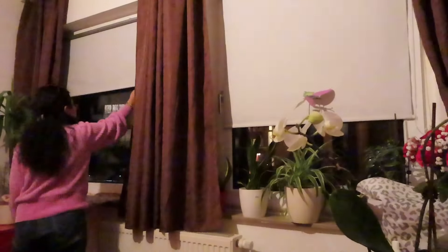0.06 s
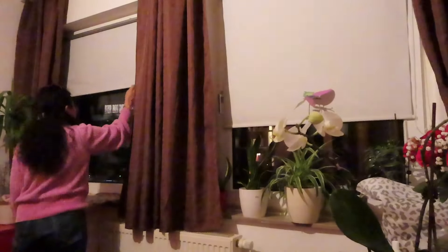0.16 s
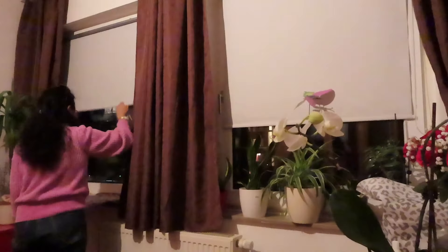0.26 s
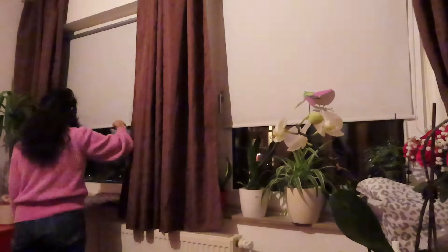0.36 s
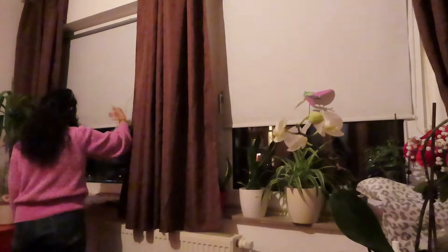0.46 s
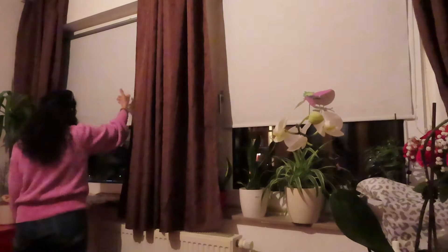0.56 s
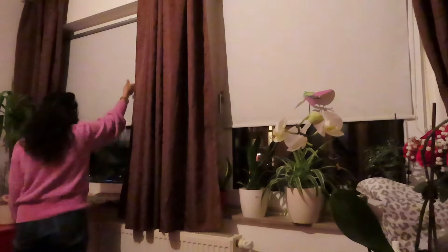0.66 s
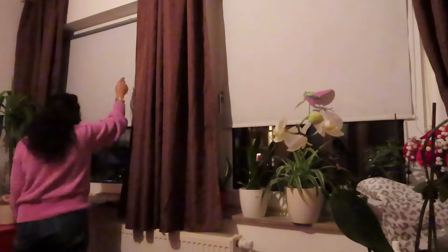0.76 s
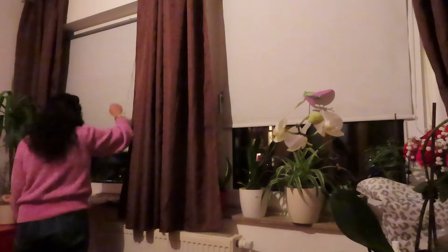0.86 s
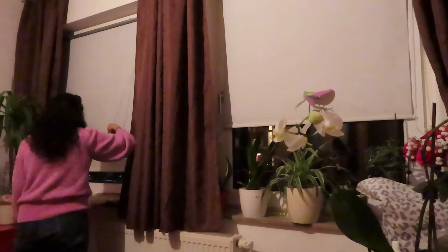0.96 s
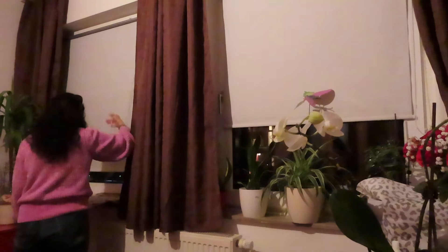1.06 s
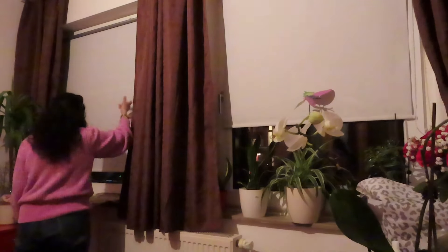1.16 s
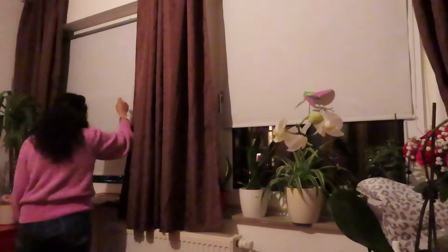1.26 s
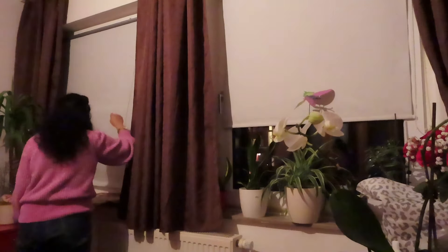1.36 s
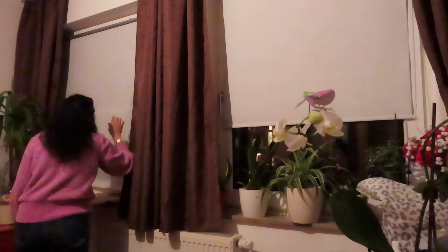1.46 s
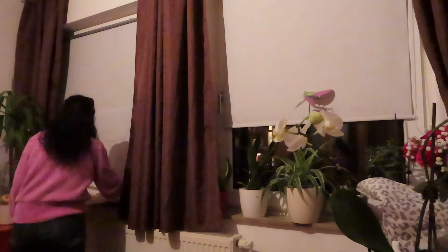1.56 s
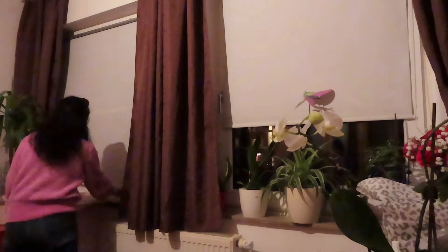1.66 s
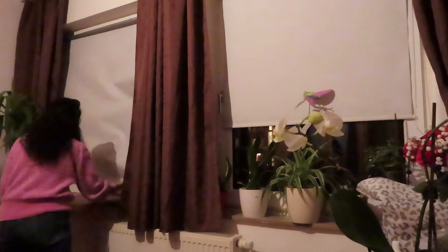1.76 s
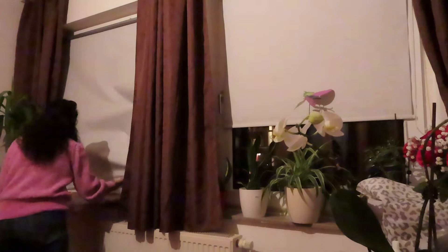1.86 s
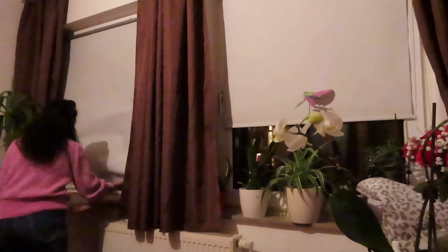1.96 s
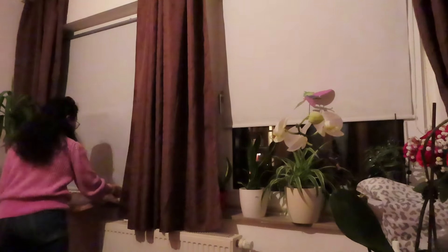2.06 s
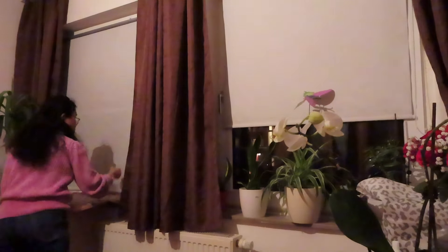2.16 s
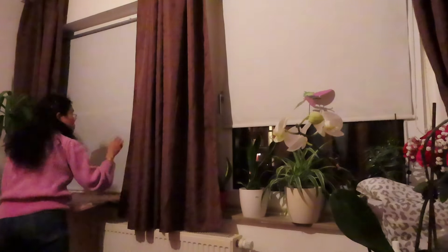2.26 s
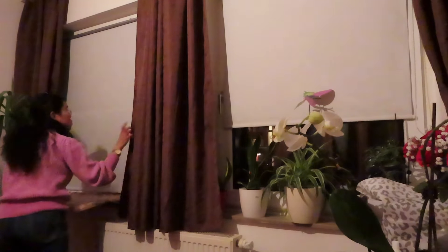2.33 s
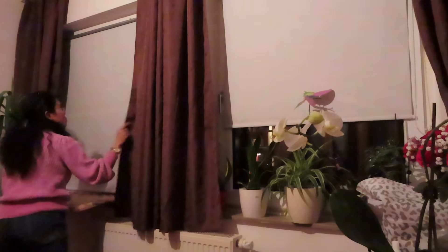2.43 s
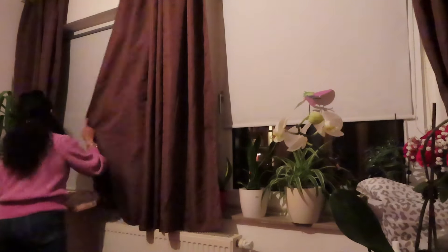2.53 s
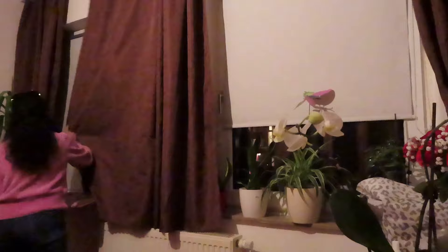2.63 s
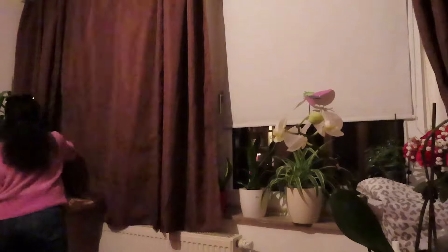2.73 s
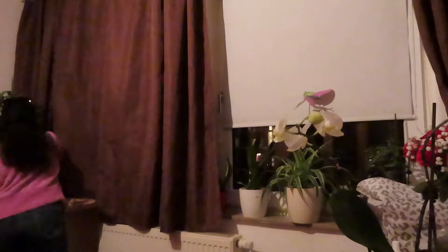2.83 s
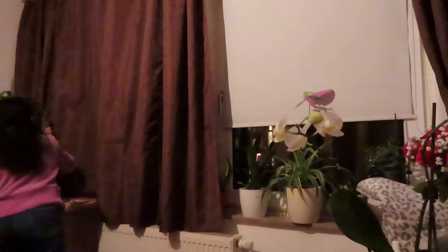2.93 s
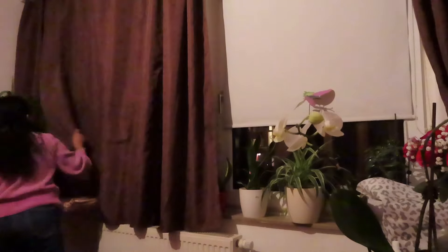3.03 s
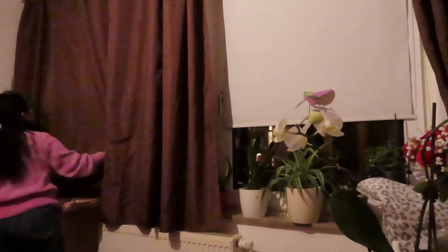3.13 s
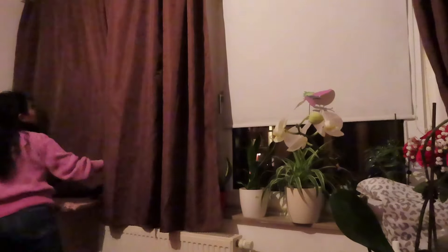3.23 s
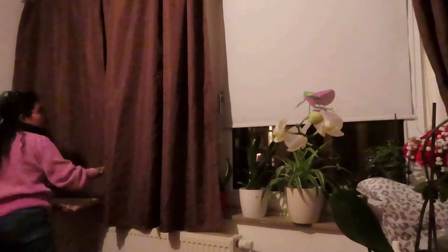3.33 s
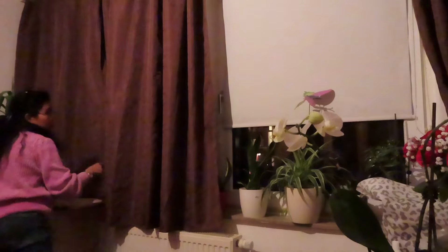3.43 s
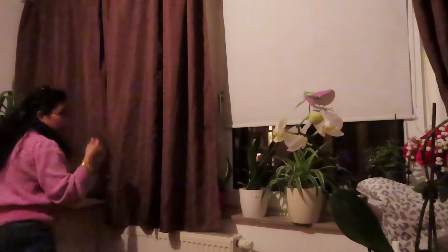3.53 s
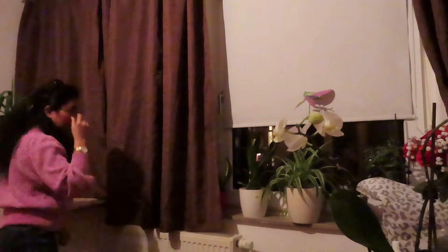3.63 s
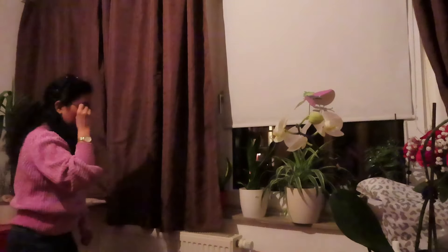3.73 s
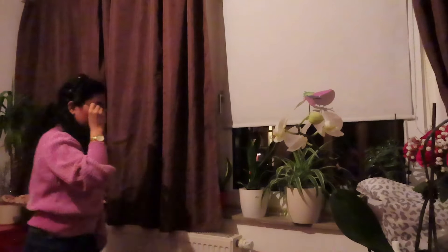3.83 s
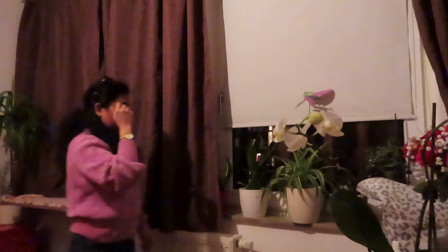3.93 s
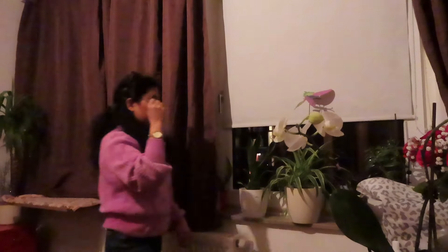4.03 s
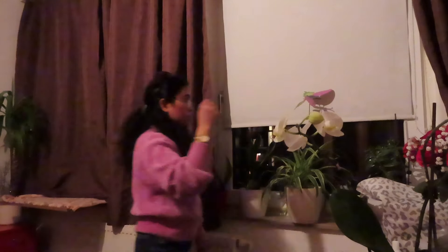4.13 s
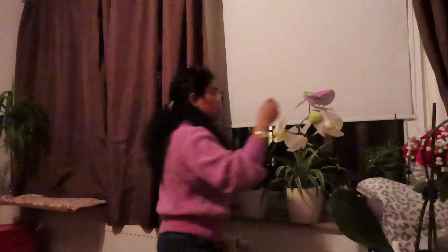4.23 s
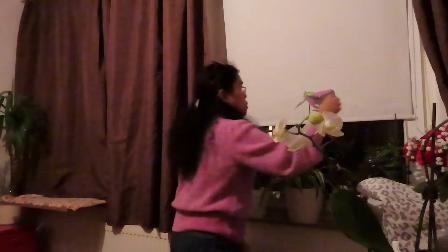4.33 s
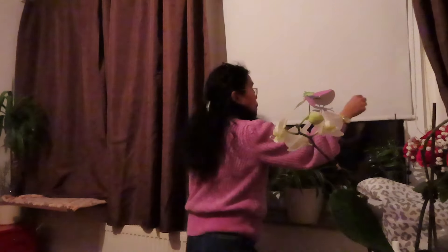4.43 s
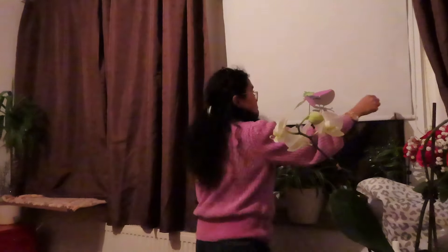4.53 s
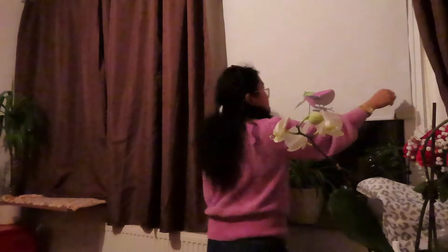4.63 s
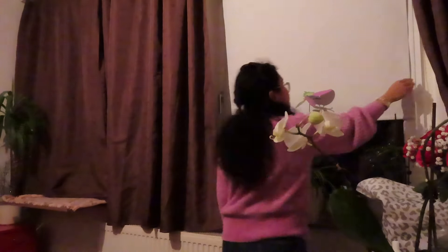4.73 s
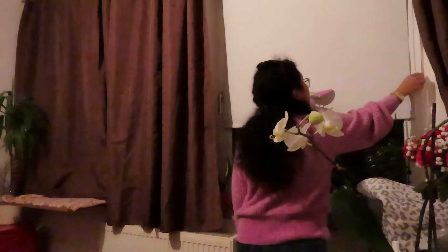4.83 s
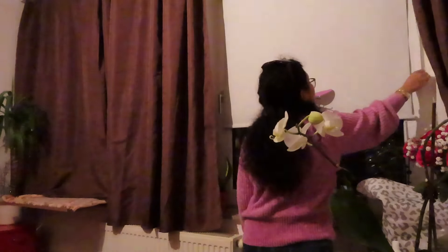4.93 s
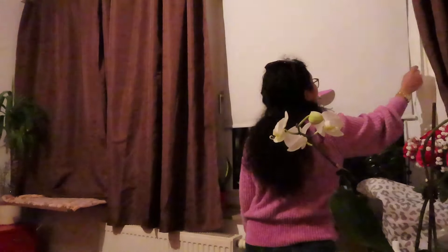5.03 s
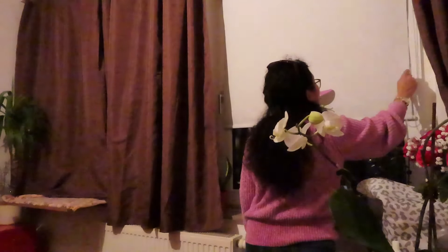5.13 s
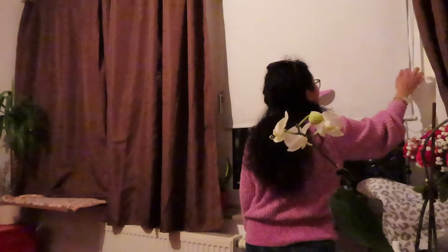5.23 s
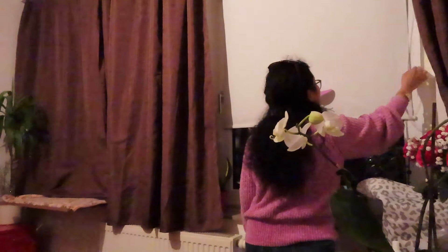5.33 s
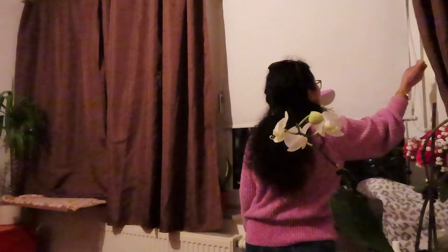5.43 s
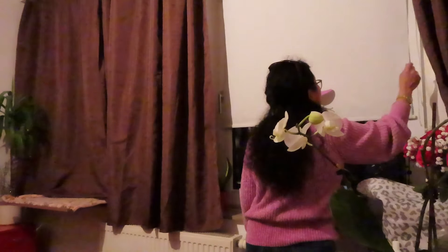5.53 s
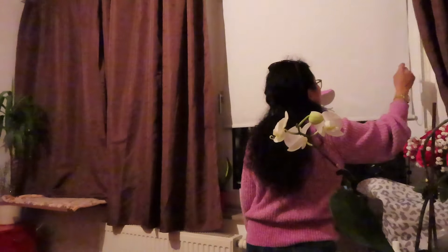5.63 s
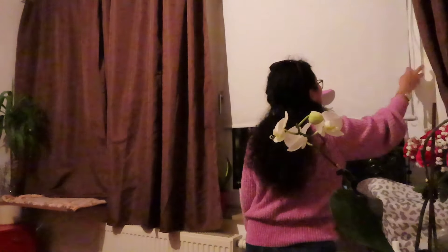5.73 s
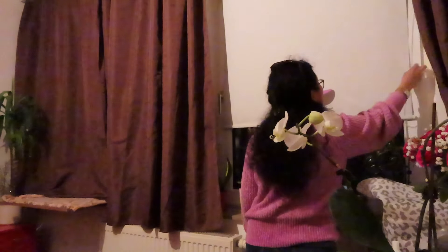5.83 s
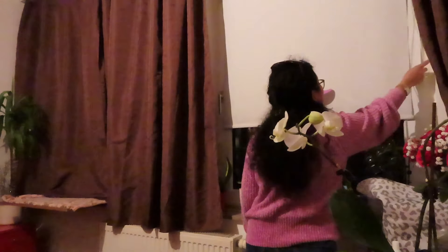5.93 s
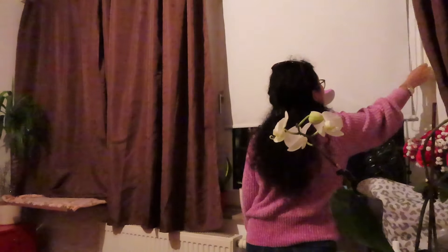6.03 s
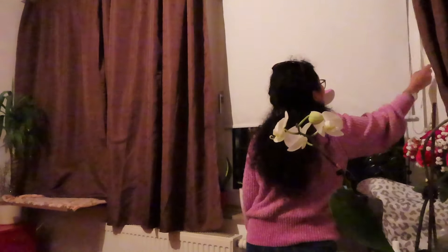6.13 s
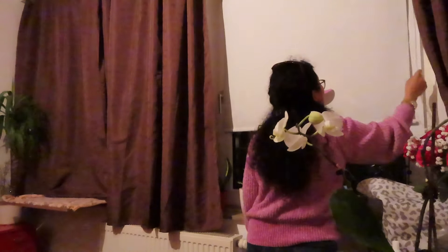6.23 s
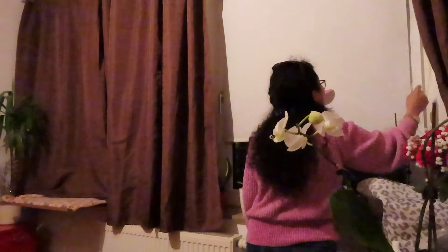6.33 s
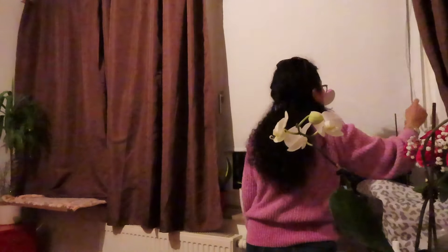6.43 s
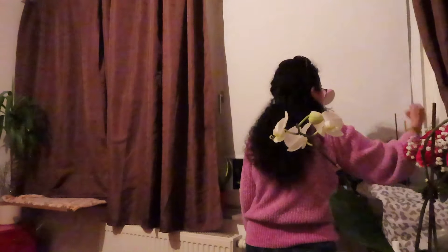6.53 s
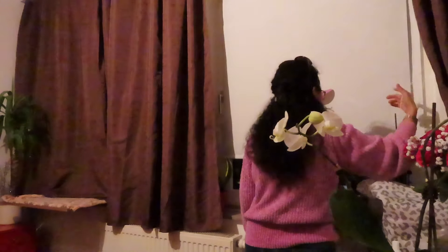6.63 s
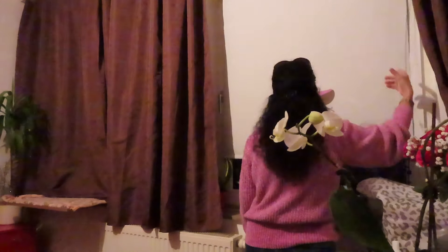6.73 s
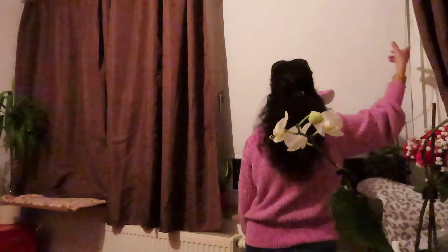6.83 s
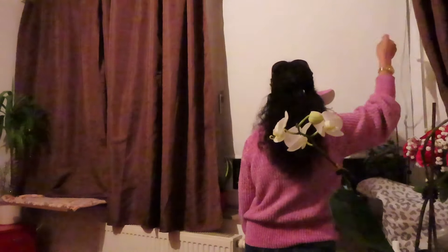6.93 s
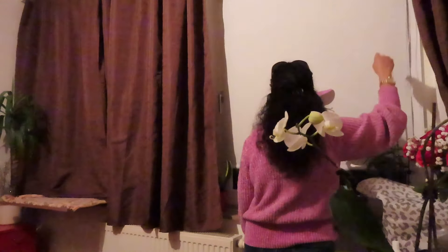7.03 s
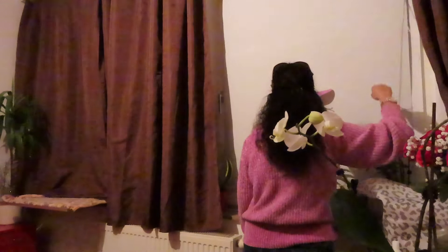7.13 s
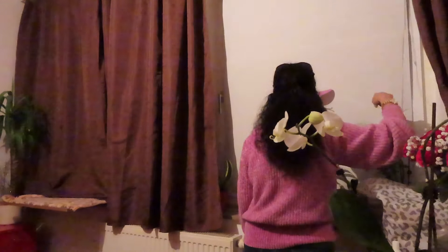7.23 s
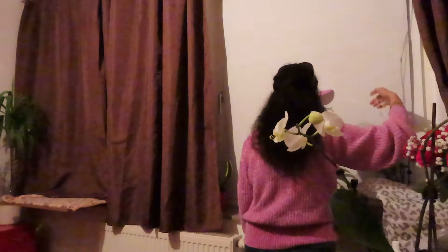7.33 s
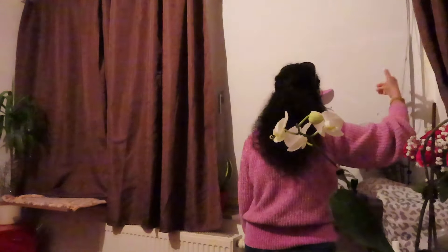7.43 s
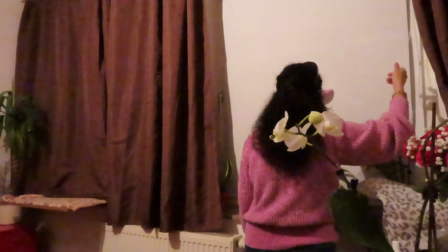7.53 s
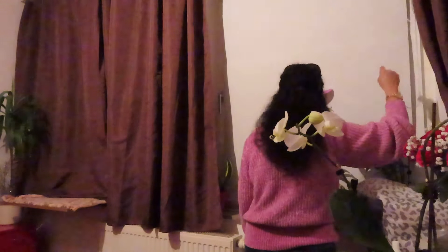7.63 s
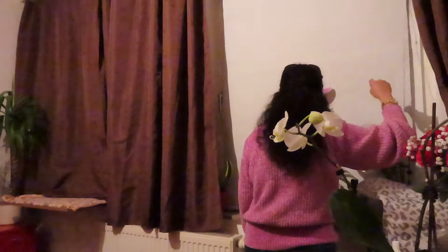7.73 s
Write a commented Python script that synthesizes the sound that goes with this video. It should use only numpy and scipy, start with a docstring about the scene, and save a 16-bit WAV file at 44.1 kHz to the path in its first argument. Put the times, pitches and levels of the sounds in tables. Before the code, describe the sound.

A roller blind's bead chain rattles down, its bar knocks sharply, a curtain sweeps twice along its rail, then a thump and a squeaky second blind.

```python
"""In a living room someone lowers a roller blind by its bead chain until the bottom bar knocks on the sill,
draws a curtain along its rail in two sweeps, crosses the room with one dull thump,
and lowers a second blind whose pulley squeaks. Chains and gliders are random ticks and rubbing noise through
resonant filters; knocks and clatters are noise bursts; squeaks are unsteady sines over a soft room hush."""
import sys
import numpy as np
from scipy import signal
from scipy.fft import rfft, irfft, next_fast_len
from scipy.io import wavfile

SR = 44100
rng = np.random.default_rng(int(sys.argv[2]) if len(sys.argv) > 2 else 0)


def transcribe(u):
    """Save the signal u as a 16-bit wav file named by the first command-line argument.

    u: samples, shape (n,) or (channels, n), limited to [-1, 1]; the rate is SR.
    q: integer samples, one column per channel.
    """
    v = np.clip(np.atleast_2d(u).T, -1, 1)
    q = np.round(v * 32767).astype(np.int16)
    wavfile.write(sys.argv[1], SR, q)


N = 343098  # length in samples
T = np.arange(N) / SR  # time in s


def amp(db):
    """Decibels to gain."""
    return 10 ** (np.asarray(db) / 20)


def evened(x):
    """Scales to rms 1."""
    return x / np.sqrt(np.mean(x ** 2) + 1e-20)


def unit_energy(x):
    """Scales to energy 1."""
    return x / np.linalg.norm(x)


def read(points, hz):
    """Reads a spectrum on a log-frequency axis."""
    f, value = np.transpose(points)
    return np.interp(np.log(hz + 1), np.log(f + 1), value)


def add(mix, start_s, sound):
    """Mixes a sound in at its start time."""
    part = mix[round(start_s * SR):][:len(sound)]
    part += sound[:len(part)]


def band(x, lo_hz, hi_hz, order=3):
    """Causal band-pass."""
    edges = [lo_hz, min(hi_hz, SR / 2 - 1)]
    return signal.sosfilt(signal.butter(order, edges, "band", fs=SR, output="sos"), x)


def colour(x, spectrum, rings=(), size=4096):
    """Causal filter of energy 1: a broad spectrum with resonances standing out of it."""
    hz = abs(np.fft.fftfreq(size, 1 / SR))
    peaks = sum(amp(db) / (1 + (2 * (hz - f) / width) ** 2) for f, width, db in rings)
    gain = amp(read(spectrum, hz)) * (1 + peaks)
    # minimum phase: the energy comes as early as it can
    minimum_phase = np.exp(signal.hilbert(np.log(gain)).conj())
    response = np.fft.ifft(minimum_phase).real[:size // 2]
    return signal.oaconvolve(x, unit_energy(response))[:len(x)]


def wander(hz, size):
    """Chance of rms 1 that drifts at up to hz swings a second."""
    step = np.arange(size) * 2 * hz / SR
    knots = rng.standard_normal(size // 8)
    return evened(np.interp(step, np.arange(len(knots)), knots))


def burst(t60, rise, grain=1, size=12000):
    """A swarm of tiny collisions that swells and dies; grain above 1 lets a few stand out; energy 1."""
    t = T[:size]
    hits = rng.standard_normal(size)
    grains = np.sign(hits) * abs(hits) ** grain
    return unit_energy(grains * amp(-60 * t / t60) * (1 - np.exp(-t / rise)) ** 2)


def pulled(pulls, body_follow, fizz_follow):
    """Each movement speeds up, holds and slows down; body and fizz grow as powers of the speed."""
    body, fizz = np.zeros((2, N))
    for start, rise, hold, fall, db, bright_db in pulls:
        end = start + rise + hold + fall
        ramp = np.minimum((T - start) / rise, (end - T) / fall)
        speed = np.sin(np.pi / 2 * np.clip(ramp, 0, 1))
        body = np.hypot(body, amp(db) * speed ** body_follow)
        fizz = np.hypot(fizz, amp(db + bright_db) * speed ** fizz_follow)
    return body, fizz


def slide(stroke, spectrum, rings, per_s, spread_db, rub, flutter_db, body_db, fizz_db, rumble_db, rumble_follow):
    """Beads or gliders tick over an edge, with rubbing between the ticks; their housing rings and rumbles."""
    strengths = amp(spread_db * np.minimum(rng.exponential(1, N), 3))
    ticks = (rng.random(N) < per_s / SR) * rng.choice([-1, 1], N) * strengths
    drive = (evened(ticks) + rub * rng.standard_normal(N)) * amp(flutter_db * wander(47, N))
    # small damped modes of the housing come and go as the point of contact moves
    modes = sum(.45 * wander(9, N) * signal.oaconvolve(drive, burst(.025, .0003))[:N] for _ in range(2))
    sound = colour(drive + modes, spectrum, rings)
    edges_hz = [(60, 500), (500, 5000), (5000, 18000)]
    low, mid, top = (evened(band(sound, lo, hi, order=4)) for lo, hi in edges_hz)
    body, fizz = stroke
    # the mounting rumbles even under a light pull
    rumble = body.max() * (body / body.max()) ** rumble_follow
    return amp(body_db) * body * mid + amp(fizz_db) * fizz * top + amp(rumble_db) * rumble * low


# spectrum of the room's hush: [pitch_hz, level_db]
HUSH_SPECTRUM = [(15, -51), (25, -3.5), (49, 5.5), (193, 2.5), (288, 0), (313, 0.5), (348, -4), (507, -4),
                 (550, -8.5), (664, -5.5), (892, -4.5), (1410, -10.5), (1940, -10.5), (11000, -29),
                 (15400, -40)]
# how far the hush spreads, side against middle: [pitch_hz, side_db]
HUSH_WIDTH = [(60, -13.5), (130, -7.5), (290, 3), (640, -0.5), (1410, -2.5), (3100, -2), (6820, -3.5),
              (15000, -3)]


def room_tone(hush_db=-52.6, sway_db=-0.08):
    """The low, slightly swaying hush of the room: independent middle and side noise spread it all round."""
    mid, other = (evened(colour(rng.standard_normal(N), HUSH_SPECTRUM)) for _ in range(2))
    side = irfft(rfft(other) * amp(read(HUSH_WIDTH, np.fft.rfftfreq(N, 1 / SR))), N)
    level = amp(hush_db + sway_db * wander(2.008, N))
    return level * np.array([mid + side, mid - side])


# the slack chain swinging, and clothes and cloth stirring; brightness is fizz against body:
# [start_s, speeding_up_s, steady_s, slowing_down_s, level_db, brightness_db]
STIRS = [(1.72, 0.089, 0.044, 0.065, -42, -18.5), (1.88, 0.056, 0.096, 0.097, -51.5, -22),
         (2.3, 0.23, 0.046, .05, -54, -22), (3.35, 0.13, 0.63, .6, -60.5, -24.5),
         (5.05, 0.042, .02, .05, -51, -21.5), (5.39, 0.13, 0.018, .06, -52, -17.5),
         (5.75, 0.36, .05, .05, -53, -22)]


def stirs():
    """Slack chain and cloth stir faintly: mostly rubbing, with sparse ticks and no strong ringing tones."""
    run = pulled(STIRS, body_follow=0.98, fizz_follow=1.1)
    return slide(run, LEFT_SPECTRUM, [], per_s=260, spread_db=2.5, rub=2.9, flutter_db=3.5,
                 body_db=-2.0, fizz_db=4.0, rumble_db=-10.0, rumble_follow=0.5)


def throb(hz, swell):
    """A low resonance that swells to 1 in swell seconds and is damped again."""
    t = T[:12000]
    return (t / swell * np.exp(1 - t / swell)) ** 3 * np.sin(2 * np.pi * hz * t)


# steps and bumps, and a faint low thud as the sound begins; level is that of the throb's peak:
# [start_s, pitch_hz, level_db, swell_s]
THUMPS = [(.004, 56, -39.5, 0.0086), (4.172, 62, -41, .012), (4.6598, 142, -9, 0.01),
          (7.195, 50.3, -30, 0.014)]
# spectrum of their soft contact: [pitch_hz, level_db per Hz]
CONTACT_SPECTRUM = [(180, -16), (300, -4), (1090, -19), (1260, -26.5), (2340, -24.5), (3390, -35),
                    (7000, -40), (9100, -77), (15400, -120)]


def thumps(boom_db=-25, boom_swell=0.034, boom_factor=1.157, contact_db=6):
    """Dull, low thumps: a soft contact, a short low throb and a faint later boom."""
    out = np.zeros(N)
    for start, hz, db, swell in THUMPS:
        contact = band(colour(burst(0.11, 0.00076), CONTACT_SPECTRUM), 160, 3800, order=5)
        boom = throb(hz * boom_factor, boom_swell)
        add(out, start, amp(db) * (throb(hz, swell) + amp(boom_db) * boom + amp(contact_db) * contact))
    return out


# chains clattering on themselves and the frame, and gliders jolting; levels before the function's gains,
# t60 that of the clack: [start_s, clack_db, tick_db, t60_s]
CLATTERS = [(.209, -41, -59, 0.044), (0.23, -35, -41.5, .05), (.547, -37.5, -54, 0.095),
            (0.614, -37, -56, 0.085), (.803, -27.5, -44, 0.072), (1.186, -37.5, -65, 0.044),
            (1.24, -15, -47, 0.057), (1.25, -18.5, -46, 0.034), (1.62, -32, -59, 0.041),
            (1.69, -27.5, -36, 0.069), (1.758, -22.5, -37, 0.088), (2.265, -37, -55.5, .06),
            (2.543, -33, -41.5, 0.019), (3.01, -21, -39.5, 0.094), (5.21, -36.5, -43.5, 0.019),
            (5.317, -35.5, -59, 0.064), (5.547, -38, -44, 0.02), (5.846, -28, -43, 0.067),
            (5.949, -51, -51.5, 0.036), (5.979, -43.5, -45.5, .07), (6.064, -54, -54.5, .05),
            (6.227, -34, -47, 0.025), (6.964, -51, -48.5, 0.062), (6.991, -37, -46.5, .02),
            (7.131, -25, -37, .04), (7.305, -32, -42.5, 0.048), (7.684, -20, -40, 0.06)]
# small parts left ringing after a touch: [start_s, pitch_hz, level_db, t60_s]
PINGS = [(2.075, 670, -44.5, 0.19), (5.554, 3000, -37.5, 0.045), (5.319, 1500, -36, 0.02)]


def clatters(clack_db=14, tick_db=20, swell_share=0.049):
    """Beads strike singly or in clusters that swell more slowly: a plastic clack and a bright tick."""
    out = np.zeros(N)
    for start, low_db, high_db, t60 in CLATTERS:
        rise = swell_share * t60
        clack = band(band(burst(t60, rise), 820, 3260, order=2), 600, 7100)
        tick = band(burst(t60 * 0.88, rise, grain=2.6), 2200, 10800, order=2)
        clack = amp(low_db + clack_db) * unit_energy(clack)
        tick = amp(high_db + tick_db) * unit_energy(tick)
        add(out, start, clack + tick)
    t = T[:SR // 2]
    for start, hz, db, t60 in PINGS:
        add(out, start, amp(db - 60 * t / t60) * np.sin(2 * np.pi * hz * t))
    return out


# the two sweeps of the curtain; brightness is fizz against body: [time_s, level_db, brightness_db]
FIRST_SWEEP = [(2.52, -58, -24), (2.548, -47, -13), (2.558, -37, -18), (2.652, -27, -11.5),
               (2.692, -24.5, -12), (2.79, -31.5, -18), (2.89, -49.5, -21)]
SECOND_SWEEP = [(2.89, -56, -20), (2.9, -50, -9), (2.95, -41, -17.5), (3.104, -34, -13.5),
                (3.138, -22, -15), (3.204, -24.5, -18), (3.27, -44, -18), (3.44, -58.5, -16)]
# broad timbre of the rail: [pitch_hz, level_db per Hz]
RAIL_SPECTRUM = [(59, -56), (100, -19), (131, -16.5), (383, -25.5), (472, -18.5), (582, -19), (797, -4),
                 (1260, -0.5), (2520, 3), (2920, -0.5), (4730, -12.5), (7350, -24.5), (11900, -26.5),
                 (15000, -41)]
# resonances of the rail under each sweep: [pitch_hz, width_hz, level_db]
FIRST_RINGS = [(2000, 440, -5), (4380, 450, 0), (4960, 330, 4)]
SECOND_RINGS = [(2570, 220, -18), (4400, 260, -12)]


def curtain():
    """Gliders chatter densely along the rail in two sweeps, each waking other resonances of it."""
    out = np.zeros(N)
    for sweep, rings in [(FIRST_SWEEP, FIRST_RINGS), (SECOND_SWEEP, SECOND_RINGS)]:
        out += slide(swept(sweep), RAIL_SPECTRUM, rings, per_s=1600, spread_db=1.5, rub=0.74, flutter_db=0.84,
                     body_db=-0.8, fizz_db=3.0, rumble_db=-18.5, rumble_follow=0.49)
    return out


def swept(sweep):
    """Strength of body and fizz along one sweep of the curtain."""
    s, level_db, bright_db = np.transpose(sweep)
    body = (T >= s[0]) * (T < s[-1]) * amp(np.interp(T, s, level_db))
    return body, body * amp(np.interp(T, s, bright_db))


# hand pulls on the left chain; brightness is fizz against body:
# [start_s, speeding_up_s, steady_s, slowing_down_s, level_db, brightness_db]
LEFT_PULLS = [(.195, 0.13, 0.04, 0.068, -33.5, -14.5), (.785, 0.089, 0.068, 0.089, -30.5, -15.3),
              (1.24, 0.064, .02, .06, -37, -21.5), (1.26, .12, 0.019, 0.074, -35.5, -15)]
# broad timbre of the left blind: [pitch_hz, level_db per Hz]
LEFT_SPECTRUM = [(41, -36), (70, -11.5), (198, -10.5), (248, -19), (340, -14), (639, -19.5), (749, -6.5),
                 (1350, -4.5), (1850, -3.5), (2770, -7.5), (3470, -9), (4870, -16), (11200, -19.5),
                 (15400, -29.5)]
# resonances of its roller housing: [pitch_hz, width_hz, level_db]
LEFT_RINGS = [(211, 25, 1.5), (960, 67, 3), (1910, 500, 7.5), (3280, 1100, 4)]


def left_blind():
    """Hand pulls run the bead chain over its pulley in dense ticks that ring the roller housing."""
    run = pulled(LEFT_PULLS, body_follow=2.06, fizz_follow=2.2)
    return slide(run, LEFT_SPECTRUM, LEFT_RINGS, per_s=1000, spread_db=2.0, rub=0.78, flutter_db=1,
                 body_db=-2.34, fizz_db=6.0, rumble_db=-11.0, rumble_follow=0.7)


# tugs on the right chain; brightness is fizz against body:
# [start_s, speeding_up_s, steady_s, slowing_down_s, level_db, brightness_db]
RIGHT_PULLS = [(6.235, 0.047, .03, .05, -40.5, -16.5), (6.32, 0.055, 0.13, .06, -43, -15.5),
               (6.995, .045, .16, 0.044, -36, -16.5), (7.21, 0.025, .06, 0.037, -47, -13),
               (7.62, 0.11, 0.043, .06, -33, -20)]


def right_run():
    """Tugs on the right chain: its fizz rises almost in step with speed, its body more steeply."""
    return pulled(RIGHT_PULLS, body_follow=1.84, fizz_follow=.9)


# broad timbre of the right blind: [pitch_hz, level_db per Hz]
RIGHT_SPECTRUM = [(41, -49), (70, 8.5), (290, -4.5), (732, -7.5), (1050, -2.5), (1320, -5), (1850, -3),
                  (2160, -7.5), (3170, -11.5), (6100, -26.5), (10000, -17.5), (12600, -25), (15400, -32)]
# resonances of its roller housing: [pitch_hz, width_hz, level_db]
RIGHT_RINGS = [(298, 32, 8.5), (1080, 87, -11), (2920, 590, -9)]


def right_blind(run):
    """The right chain ticks more sparsely and unevenly than the left and rumbles more in its housing."""
    return slide(run, RIGHT_SPECTRUM, RIGHT_RINGS, per_s=550, spread_db=3.0, rub=0.8, flutter_db=1.8,
                 body_db=-0.17, fizz_db=2.5, rumble_db=-5.5, rumble_follow=0.63)


def snags(strength, per_s=90, snag_db=22, spread_db=3, t60=0.015):
    """While the chain runs, stray beads catch on the pulley with a bright tick."""
    hits = (rng.random(N) < per_s / SR) * amp(snag_db + spread_db * rng.standard_normal(N))
    ticks = signal.oaconvolve(hits * strength, burst(t60, .0008, grain=2.4))[:N]
    return band(ticks, 3000, 13000, order=2)


# squeaks of the pulley: [start_s, length_s, pitch_hz, level_db]
SQUEAKS = [(5.55, 0.033, 12000, -61), (6.241, .044, 12220, -41), (6.326, 0.032, 12300, -44),
           (6.345, 0.068, 12150, -38.5), (6.459, 0.057, 12450, -36.5), (7.056, 0.038, 12700, -43),
           (7.216, 0.067, 8500, -35), (7.275, 0.044, 12260, -46), (7.653, .052, 12500, -35),
           (7.76, .04, 8520, -36)]


def squeaks(jitter=0.0087, shimmer_db=3.5, scratch_db=-19, scoop=0.04, scoop_s=0.0083):
    """The pulley sticks and slips: unsteady sines at one of two very high pitches scoop up and scratch."""
    out = np.zeros(N)
    waver, shimmer = wander(500, N), wander(200, N)
    scratch = amp(scratch_db) * wander(2500, N)
    for start, length, hz, db in SQUEAKS:
        on = (T >= start) & (T < start + length)
        t = T[on] - start
        # starts flat by the scoop share and settles on its pitch
        pitch = hz * (1 - scoop * np.exp(-t / scoop_s)) * (1 + jitter * waver[on])
        tone = np.sqrt(2) * np.sin(2 * np.pi * np.cumsum(pitch) / SR)
        arch = abs(np.sin(np.pi * (t / length) ** 1.14)) ** 1.1  # peaks a little late
        out[on] += amp(db + shimmer_db * shimmer[on]) * arch * (1 + scratch[on]) * tone
    return out


# bottom bars knocking; level before the function's gain, rattle_share 0-1 of the energy, the rest one click:
# [start_s, level_db, spectrum_top_hz, rattle_t60_s, rattle_share]
KNOCKS = [(1.368, -7.5, 2400, 0.085, 0.74), (1.8075, -2.5, 4000, 0.036, 0.98),
          (1.8115, -6, 13900, 0.076, 0.3), (1.817, -10, 2030, 0.078, 0.97),
          (1.876, -7.5, 1120, 0.078, 0.97), (1.94, -20, 2980, 0.11, 1), (7.711, -9.5, 2310, 0.031, 0.9)]
# timbre of the bar: [pitch_hz, level_db per Hz]
BAR_SPECTRUM = [(59, -42), (100, -6), (352, -14.5), (748, -5.5), (885, -9), (1160, -7), (1700, -10),
                (2370, -6), (2990, -13.5), (3610, -19), (5600, -28), (8340, -35), (15000, -30)]


def knocks(hit_db=8):
    """A blind's bottom bar knocks and bounces: a click and a short rattle through the bar's timbre."""
    out = np.zeros(N)
    for start, db, top_hz, t60, share in KNOCKS:
        share = np.clip(share, 0, 1)
        blow = np.sqrt(share) * burst(t60, .0025)
        blow[0] += np.sqrt(1 - share)
        add(out, start, amp(hit_db + db) * band(colour(blow, BAR_SPECTRUM), 78, top_hz, order=2))
    return out


# decay of the room: [pitch_hz, t60_s]
ROOM_DECAY = [(100, 0.44), (600, 0.59), (2500, 0.27), (13000, 0.082)]


def room(x, wet_db):
    """Adds a tail of reflections in which each band dies at its own speed."""
    noise = rng.standard_normal(SR) * (T[:SR] > .006)  # a gap before the first reflection
    hz, t, z = signal.stft(noise, SR, nperseg=256)
    decay = amp(-60 * t / read(ROOM_DECAY, hz)[:, None])
    tail = signal.istft(z * decay, SR, nperseg=256)[1]
    return x + amp(wet_db) * signal.fftconvolve(x, unit_energy(tail))[:N]


# stereo width, side against middle, before each source's own trim: [pitch_hz, side_db]
STEREO_WIDTH = [(160, -21), (330, -5), (600, -14), (1300, -19), (2400, -16), (4400, -6), (8000, 0),
                (14000, 3)]


def stereo(x, lead, width_db):
    """Places a sound by phase (lead > 0: the left channel leads) and widens it with reflections."""
    size = next_fast_len(N + SR // 2)
    lead, hz = np.clip(lead, -1, 1), np.fft.rfftfreq(size, 1 / SR)
    reflections = rfft(burst(.03, .0003), size) * .8 + rfft(burst(.3, .002), size) * .6
    # a quarter-turn phase shift makes one channel lead
    difference = 1j * lead + np.sqrt(1 - lead ** 2) * reflections
    width = amp(read(STEREO_WIDTH, hz) + width_db)
    side = irfft(rfft(x, size) * width * difference, size)[:N]
    return np.array([x + side, x - side])


def scene():
    """Left window first, then the right one, in one room."""
    run = right_run()
    sliding = left_blind() + right_blind(run) + curtain() + stirs() + knocks()
    striking = clatters() + snags(run[1]) + squeaks()
    windows = room(sliding, wet_db=-20.5) + room(striking, wet_db=-13.5)
    crossed = np.clip(T - 4, 0, 1)  # from the left window to the right between 4 and 5 s
    at_left = stereo(windows * (1 - crossed), lead=.3, width_db=0)
    at_right = stereo(windows * crossed, lead=-.65, width_db=0)
    return at_left + at_right + stereo(thumps(), lead=-0.6, width_db=-14) + room_tone()


def record(dry):
    """Makes the left channel a little louder, then limits the band to 15.6 kHz."""
    low_pass = signal.firwin(511, 15600, window=("kaiser", 9), fs=SR)
    return signal.oaconvolve(dry * amp([[.15], [-.15]]), low_pass[None], "same")


dry = scene()
out = record(dry)
transcribe(out)
```